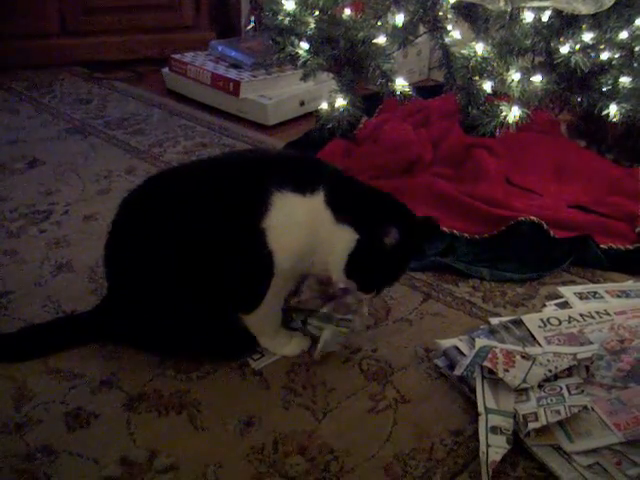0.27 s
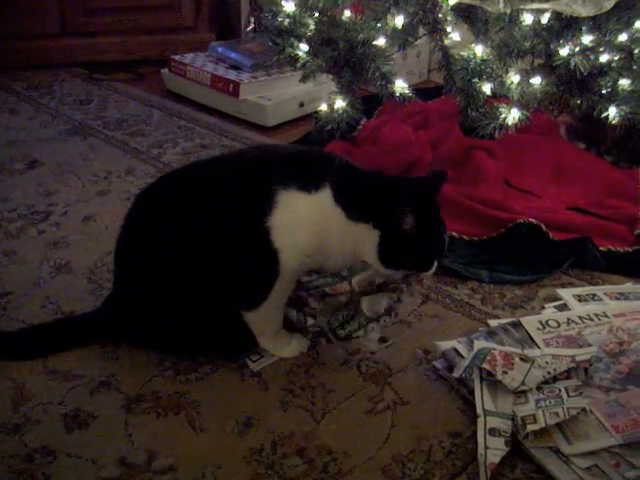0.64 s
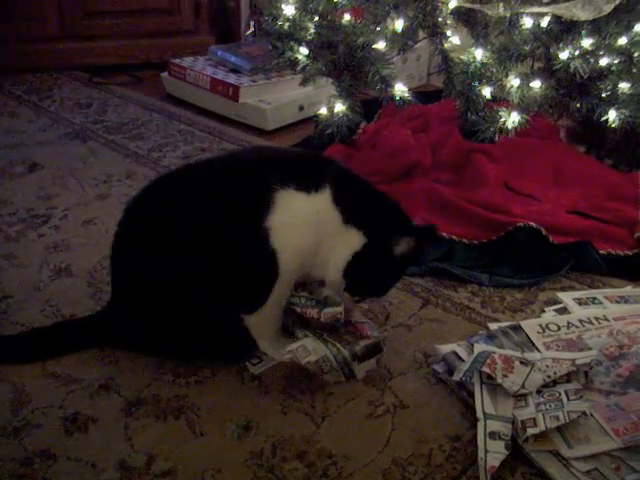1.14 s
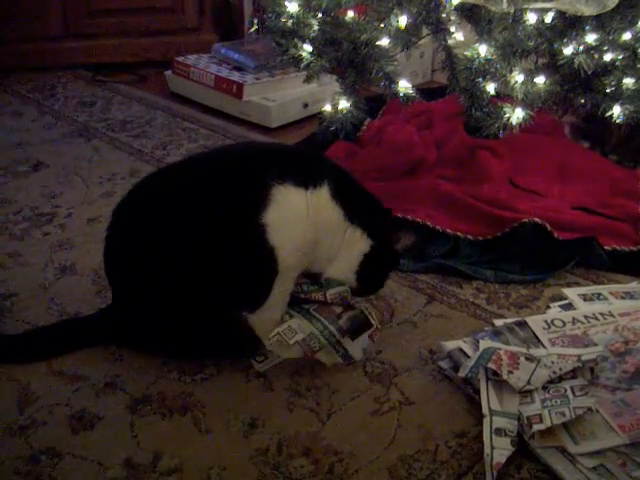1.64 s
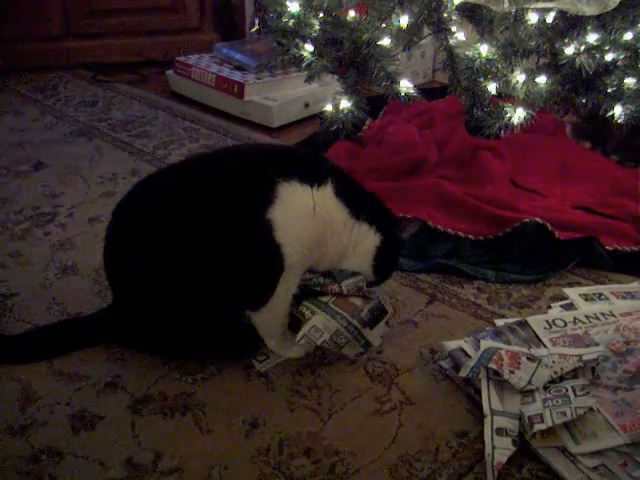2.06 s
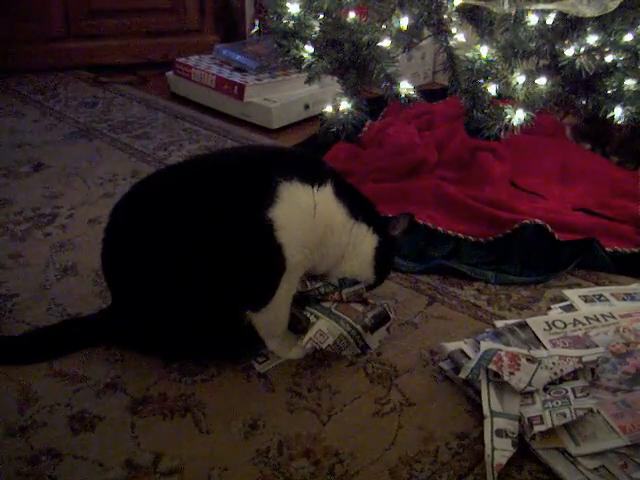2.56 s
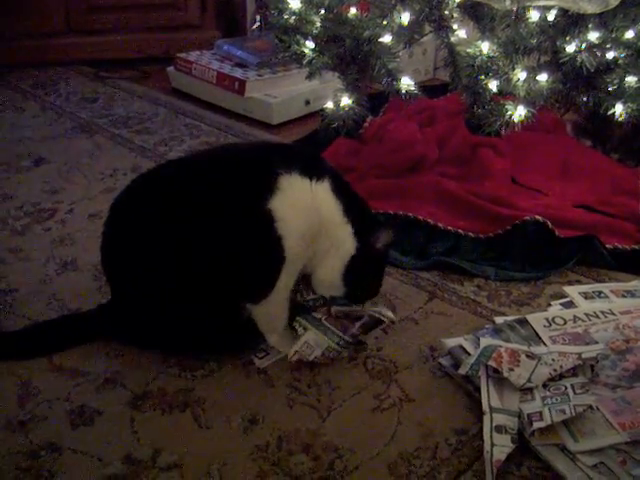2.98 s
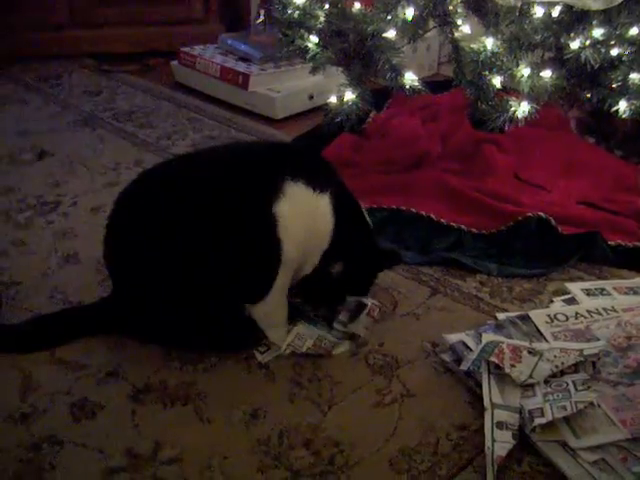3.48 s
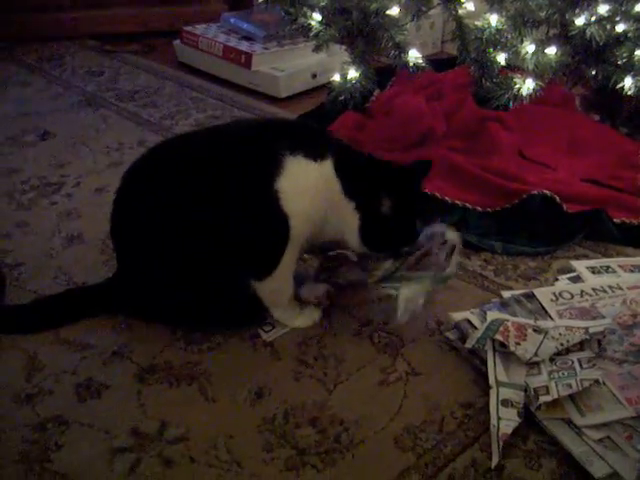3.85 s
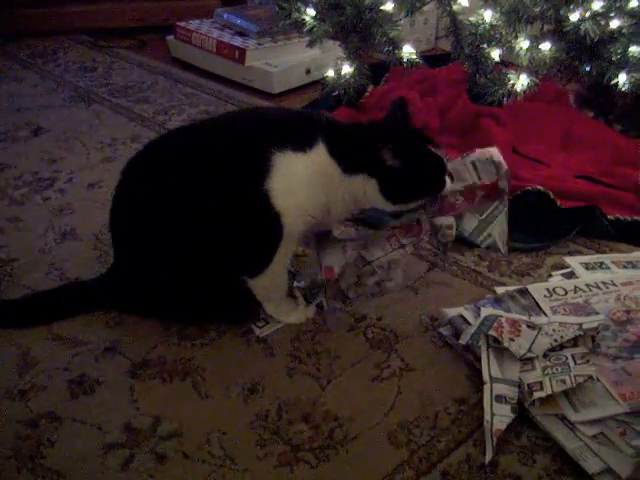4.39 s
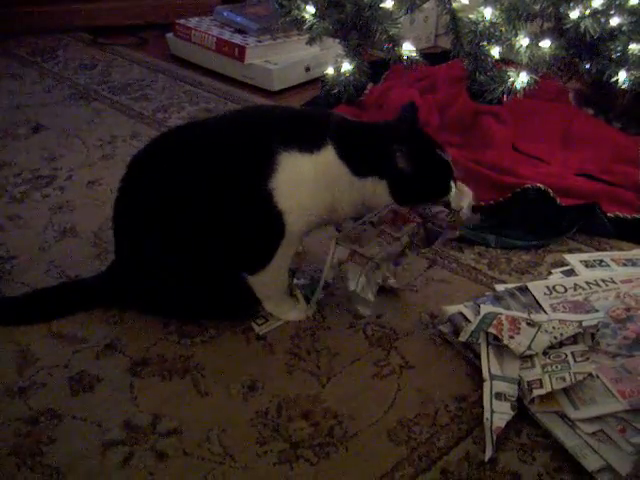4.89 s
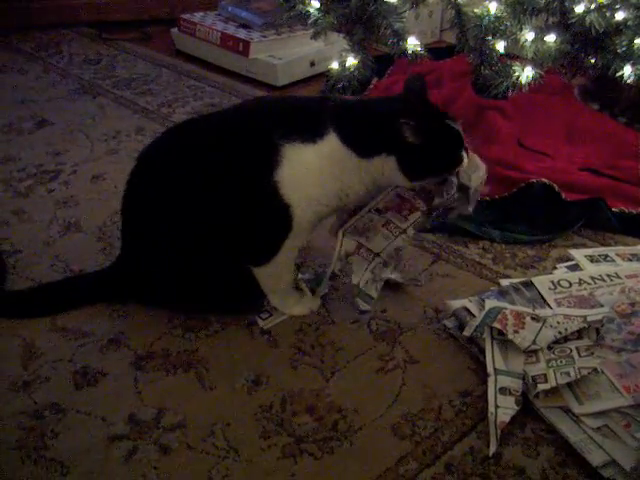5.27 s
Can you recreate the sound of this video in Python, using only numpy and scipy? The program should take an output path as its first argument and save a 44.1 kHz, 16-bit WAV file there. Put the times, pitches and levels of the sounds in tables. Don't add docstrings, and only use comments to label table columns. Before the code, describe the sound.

Newspaper tears sharply, falls nearly quiet with small crackles and thumps, then rips again in jerky pulls, close by in a hissy room.

```python
import sys
import numpy as np
from scipy import signal
from scipy.fft import rfft, irfft, next_fast_len
from scipy.io import wavfile
from scipy.ndimage import uniform_filter1d, map_coordinates

SR = 44100
rng = np.random.default_rng(int(sys.argv[2]) if len(sys.argv) > 2 else 0)


def generate_wav(signal):
    frames = np.transpose(np.atleast_2d(signal))
    scaled = np.clip(frames, -1, 1) * 32767
    pcm = np.round(scaled).astype(np.int16)
    wavfile.write(sys.argv[1], SR, pcm)


def invert_db(level):
    return 10 ** (np.asarray(level, dtype=float) / 20)


N = 243917

# f/Hz, density/dB per Hz
HISS_SPECTRUM = [(12, -5), (25, 3), (60, -2.5), (150, -8), (500, -15), (1200, -18.5), (2000, -19.5),
                 (3500, -21.5), (6000, -19.5), (9000, -19), (10400, -17), (11300, -44.5)]
# f/Hz, rms level/dB
WHINES = [(7299, -69.5), (8078, -64.5)]
# rate/(1/s), t of one pause/s, pause length/s
SENSOR_PAUSE = (24, 1.237, .008)
# t peak/s, tearing level/dB, length/s, flapping rel/dB, crispness rel/dB
RIPS = [(0.036, -52, 0.38, 2.5, -3.5), (0.209, -46.5, .09, 6, 14.5), (0.334, -41.5, 0.11, -9.5, -12),
        (.475, -38, 0.14, -1, -6), (0.583, -31, 0.12, -8, -3.5), (2.036, -60, 0.057, 8.5, -14),
        (2.564, -66.5, 0.24, 6.5, -10), (2.82, -59.5, 0.19, 1, -6), (2.983, -57.5, 0.08, 11.5, -8),
        (3.512, -61.5, 0.29, 10, 3), (3.731, -53, .2, 8.5, -7), (3.865, -43.5, 0.052, 3.5, -0.5),
        (3.931, -32, 0.13, -3, -4), (4.087, -53.5, 0.12, -3, -6), (4.29, -41.5, 0.2, -3, -8.5),
        (4.652, -56.5, 0.19, -4, -4), (4.754, -52.5, 0.27, 0.5, -7), (4.806, -44.5, 0.17, -2, -9),
        (4.945, -53, .06, 3.5, -1), (5.116, -36.5, 0.13, -5, -5.5), (5.214, -52.5, 0.22, 3.5, -4),
        (5.347, -55.5, .3, -0.5, -2), (5.454, -39, .11, -5.5, -5), (5.535, -38, 0.058, -3, -0.5)]
# t/s, tearing level/dB, fade/s, flapping rel/dB, crispness rel/dB
TUGS = [(0.179, -44, 0.47, 4.5, -4), (0.252, -48.5, 0.12, 11, 8.5), (.5, -53.5, .15, 7, 7),
        (.62, -50, 0.085, -1, -3), (.69, -61, 0.55, 6, -4), (.92, -71, 0.039, 0, 7),
        (1.14, -59, 0.088, 7, -12), (1.604, -56.5, 0.084, 6.5, -4), (1.748, -56, 0.054, -1, -17),
        (1.8, -63, .2, 5.5, -5), (2.404, -57, 0.056, -2, -10), (2.716, -64, .06, 7, -9),
        (2.901, -52, .05, 7, -2), (3.266, -63, .3, 8, -6), (3.381, -53, 0.042, 7, -3),
        (3.586, -53.5, 0.68, -5, -9), (3.784, -48.5, 0.039, -20, -4), (3.99, -61, 0.19, 6, -4),
        (4.167, -48, 0.025, -2, -16), (4.188, -42.5, 0.19, -2, -8), (4.564, -52, 0.26, 2.5, -12),
        (4.884, -47, 0.074, 1, -19), (4.964, -46.5, 0.16, -1.5, -6), (5.304, -47, .03, 0, -11)]
# tearing level/dB, flapping rel/dB, crispness rel/dB
CREEP = (-74, 9.5, -9)
# t/s, length/s, level/dB, change to the end/dB
HAUL = (3.575, .14, -44.5, -2.5)
# f/Hz, density/dB per Hz
TEAR_SPECTRUM = [(1200, -33), (2000, -1), (3000, -1.5), (4500, -2.5), (6500, -2.5), (8000, 1), (10500, -20),
                 (11500, -62.5)]
# f/Hz, density/dB per Hz
CRISP_SPECTRUM = [(6000, -15), (7800, -15.5), (9000, 10), (10400, -1), (11500, -26.5)]
# f/Hz, density/dB per Hz
FLAP_SPECTRUM = [(60, -13.5), (150, -0.5), (300, 0), (600, -3), (1100, -5.5), (1600, -16), (2500, -46)]
# f/Hz, density/dB per Hz
SCRAPE_SPECTRUM = [(700, -13), (1200, 0.5), (1700, -1.5), (2600, -6.5), (3500, -38)]
# t/s, peak level/dB, f/Hz, after-ring rel/dB
KNOCKS = [(0.021, -34, 804, -10.5), (0.054, -35.5, 540, -22), (0.101, -30, 380, -23),
          (0.171, -31, 460, -8.5), (0.217, -29.5, 540, -14), (0.246, -33, 570, -17),
          (0.274, -45, 1320, 7.5), (0.363, -36, 530, -15), (0.561, -32.5, 730, -8), (0.723, -37, 386, -9.5),
          (1.602, -45, 1220, -12), (1.744, -43, 697, -14), (2.03, -34.5, 238, -8), (2.403, -36, 238, -15),
          (2.715, -41, 686, -20), (2.751, -39, 364, -17), (2.81, -29.5, 322, -23), (2.891, -24, 526, -48),
          (2.969, -40.5, 766, -13), (2.986, -43, 220, -3.5), (3.265, -40.5, 1100, -10.5),
          (3.354, -43, 373, -16), (3.467, -42, 880, -7.5), (3.503, -40, 530, -13),
          (3.575, -30.5, 1160, -17), (4.722, -41.5, 630, -12), (3.849, -39, 644, -26),
          (4.24, -37.5, 200, -4.5), (4.279, -38.5, 161, -4.5), (5.328, -40, 510, -10)]
# t/s, peak level/dB, brightness/dB, f/Hz
SNAPS = [(0.1731, -20, -11.5, 3110), (0.2122, -30, -4, 3200), (0.2498, -25, -3, 3200),
         (0.3202, -29, -10, 3360), (0.3597, -32.5, -13, 3100), (0.3776, -28, -14, 3280),
         (0.4257, -38, -16, 3060), (0.4674, -25, -7, 3200), (0.5637, -24.5, -2, 2380),
         (0.572, -23.5, -4, 2660), (0.5897, -23.5, -11, 3230), (0.598, -21, -4, 2670),
         (3.725, -33.5, -25, 2880), (3.7768, -29, -6.5, 3070), (3.8508, -39, -2, 2550),
         (3.8796, -36, -11, 3140), (3.908, -22, -20, 2730), (4.1606, -33, -6.5, 2570),
         (4.179, -33, -9, 2370), (4.281, -30.5, -13, 3010), (4.3159, -28.5, -20, 2180),
         (4.7168, -41, -9, 3110), (4.794, -35.5, 3.5, 2270), (4.8818, -37, -0.5, 3170),
         (4.9613, -31.5, 0.5, 1960), (5.088, -36, -4, 3000), (5.221, -33.5, -8, 2040),
         (5.2918, -33.5, -6, 2110), (5.4148, -46.5, 7, 3070), (5.439, -31.5, -4, 3020),
         (0.7893, -44.5, -12, 2500), (0.915, -48, 2.5, 3250), (1.092, -44.5, -21, 1600),
         (1.136, -47, -4, 2520), (1.2211, -41.5, -16, 2270), (1.6032, -36.5, -14, 3240),
         (1.6279, -40, -13, 2180), (1.7479, -43, -21, 2300), (2.4041, -39.5, -13, 2230),
         (2.6178, -45.5, -11, 3130), (2.7179, -46, -12, 3270), (2.814, -42, -18, 2290),
         (2.8944, -33, -10, 3260), (2.9722, -43, -15, 2120), (3.2686, -46, -15, 2310),
         (3.3562, -48, -10, 2690), (3.38, -37.5, -9, 2640), (3.5777, -47, -27, 1820),
         (4.054, -48, -4, 3150), (4.065, -42, -20, 2560), (4.0837, -43, -9, 3320), (4.5624, -49, -8, 3100),
         (4.5905, -39, -9, 3120), (4.618, -43, 1, 2400), (4.6603, -45, -14, 2900), (4.7245, -41, -6, 3020),
         (4.7707, -40, -15, 2530), (5.0328, -42.5, 1, 2160), (5.3894, -43, -7, 2830)]
# f/Hz, density/dB per Hz
SNAP_UPPER_SPECTRUM = [(2500, -15), (4000, 1), (5000, 5), (7000, 2.5), (8000, 5.5), (9500, -51)]
# t/s, level/dB, relaxation/s
TAUT_POP = (5.3004, -18, 0.0066)
# f/Hz, t60/s
ROOM_DECAY = [(200, 0.34), (1500, 0.056), (5000, 0.087), (11000, 0.017)]
# delay/s, share/1
HOUSING_ECHO = (.00052, .46)
# t/s, length/s, kept share/1
TREBLE_DIPS = [
    (.16, .012, .03),
    (2.877, .014, .5),
    (3.765, .011, .35),
    (4.942, .01, .45),
    (5.281, .008, .4),
]


def unit(x):
    return x / np.sqrt(np.mean(x ** 2) + 1e-20)


def along(points, hz):
    f, v = np.transpose(points)
    return np.interp(np.log(hz + 1), np.log(f + 1), v)


def wobble(knots_per_s):
    knots = rng.standard_normal(int(N * knots_per_s / SR) + 4)
    return map_coordinates(knots, [np.arange(N) * knots_per_s / SR])


def coloured(x, spectrum):
    size = 8192
    ceps = irfft(np.log(invert_db(along(spectrum, np.fft.rfftfreq(size, 1 / SR)))))
    ceps[1:size // 2] *= 2
    ceps[size // 2 + 1:] = 0
    kernel = irfft(np.exp(rfft(ceps)))
    return signal.fftconvolve(x, kernel / np.linalg.norm(kernel))[:N]


def camera():
    t = np.arange(N) / SR
    level_db = -60 + 1.02 + 1.66 * wobble(2.61)
    hiss = invert_db(level_db) * coloured(rng.standard_normal(N), HISS_SPECTRUM)
    tones = []
    for hz, db in WHINES:
        gain = invert_db(db + 4 + 0.5 * wobble(20))
        tones.append(gain * np.sin(2 * np.pi * hz * t + 0.65 * wobble(25)))
    rate_hz, pause_s, length_s = SENSOR_PAUSE
    from_pause = np.abs(((t - pause_s) * rate_hz + .5) % 1 - .5)
    reading = from_pause > length_s * rate_hz / 2
    return hiss + uniform_filter1d(1. * reading, size=60) * tones[0] + sum(tones[1:])


def strain():
    rise_share, rounding, attack_s = 0.55, 1.445, 0.014
    scrape_db, scrape_follows_flap = -9.5, 0.56
    t = np.arange(0, N + 44, 44) / SR
    pulls = [(s, db, rise_share * length, (1 - rise_share) * length, rounding, *mix)
             for s, db, length, *mix in RIPS]
    pulls += [(s, db, attack_s, fade, 1, *mix) for s, db, fade, *mix in TUGS]
    pulls += [(0, CREEP[0], 1, np.inf, 1, *CREEP[1:])]
    s, db, rise, fall, bend, flap_db, crisp_db = np.transpose(pulls)[..., None]
    level = db - 20 * np.abs(np.where(t < s, (s - t) / rise, (t - s) / fall)) ** bend
    scraping = level + scrape_db + scrape_follows_flap * flap_db
    layers = [level, level + flap_db, level + crisp_db, scraping]
    power = np.array([np.sum(invert_db(2 * layer), axis=0) for layer in layers])

    start, length, haul_db, change_db = HAUL
    u = (t - start) / length
    envelope = np.clip(np.minimum(u / 0.034, (1.2 - u) / 0.42), 0, 1)
    power[-1] += invert_db(2 * (haul_db + change_db * u)) * envelope ** 2
    return [np.interp(np.arange(N) / SR, t, np.sqrt(p)) for p in power]


def grains(per_s, centre_hz, octaves, cycles, spread_db):
    draw = rng.random((int(per_s * N / SR), 4))
    hz = centre_hz * 2 ** (octaves * (2 * draw[:, 1:2] - 1))
    t = np.arange(96) / SR
    size = invert_db(-spread_db * np.log(draw[:, 2:3] + 3e-3)) * np.sign(draw[:, 3:] - .5)
    shape = size * np.sin(2 * np.pi * hz * t) * np.exp(-t * hz / cycles)
    at = (draw[:, :1] * N).astype(int) + np.arange(len(t))
    return unit(np.bincount(at.ravel(), shape.ravel())[:N])


def cracks(per_s, spread_db, clump, bed):
    draw = rng.random((2, N))
    size = invert_db(-spread_db * np.log(draw[1] + 0.0026))
    breaks = (draw[0] < per_s / SR) * size * rng.standard_normal(N)
    return unit(clump * (unit(breaks) + bed * rng.standard_normal(N)))


def paper():
    tearing, flapping, crackling, scraping = strain()
    jerk = invert_db(1.2 * wobble(50) + 2.2 * wobble(260))
    buckling = grains(per_s=1700, centre_hz=4000, octaves=1.1, cycles=3, spread_db=2.6)
    fibres = cracks(per_s=2500, spread_db=1.6, clump=jerk, bed=.6)
    tear = unit(coloured(jerk * buckling + .65 * fibres, TEAR_SPECTRUM))
    crisp_clump = jerk * invert_db(2.5 * wobble(120))
    crisp = coloured(cracks(per_s=3500, spread_db=1.7, clump=crisp_clump, bed=.5), CRISP_SPECTRUM)
    flap_clump = jerk * invert_db(1.2 * wobble(40))
    flap = coloured(cracks(per_s=700, spread_db=1.7, clump=flap_clump, bed=.55), FLAP_SPECTRUM)
    scrape = coloured(cracks(per_s=1500, spread_db=1.5, clump=jerk ** .6, bed=.6), SCRAPE_SPECTRUM)

    crisp_db = 20 * np.log10(crackling / tearing)
    low = signal.sosfiltfilt(signal.butter(4, 3800, fs=SR, output="sos"), tear)
    tear = low + invert_db(0.22 * np.clip(crisp_db + 8, -10, 10)) * (tear - low)
    sheet = invert_db(-2.5) * tearing * tear + invert_db(-6.5) * crackling * crisp + invert_db(-5.0) * flapping * flap
    return sheet, invert_db(1.5) * scraping * scrape


def knocks():
    out, t = np.zeros(N + SR), np.arange(SR // 10) / SR
    for s, db, hz, ring_db in KNOCKS:
        push = np.sin(2 * np.pi * 600 * t) * np.exp(-t / .00095)
        ring = np.sin(2 * np.pi * hz * t) * invert_db(ring_db + 8 - 60 * t * hz / 13)
        puff = uniform_filter1d(rng.standard_normal(len(t)), size=14) * invert_db(-60 * t / 0.046)
        out[round((s + .004) * SR):][:len(t)] -= invert_db(db - .5) * (push + ring + .25 * puff)
    return out[:N]


def snaps():
    crisp_under_db, crisp_grows = -8.5, 0.67
    body, upper, crisp = np.zeros((3, N + SR))
    t = np.arange(SR // 10) / SR
    fizz = 0.61 * invert_db(-60 * t / 0.0028) + 0.21 * invert_db(-60 * t / 0.049)
    for s, db, upper_db, hz in SNAPS:
        burst = rng.standard_normal((2, len(t))) * fizz
        burst[:, 0] = -1
        start = round((s + .0013) * SR)
        at = slice(start, start + len(t))
        ring = np.sin(2 * np.pi * hz * t) * invert_db(-60 * t / .006)
        body[at] -= invert_db(db - .3) * (ring + .7 * np.exp(-t / .00012))
        upper[at] += invert_db(db + upper_db + 2.0) * burst[0]
        crisp[at] += invert_db(db + crisp_under_db + crisp_grows * upper_db) * burst[1]
    return body[:N] + coloured(upper, SNAP_UPPER_SPECTRUM) + coloured(crisp, CRISP_SPECTRUM)


def pop():
    start_s, db, relax_s = TAUT_POP
    t = np.arange(N) / SR - start_s

    def step(u):
        return np.clip(u / .0001, 0, 1) * np.exp(-np.abs(u) / relax_s)

    return invert_db(db) * (step(t) - step(t - HOUSING_ECHO[0]))


def room(x):
    hz, t, z = signal.stft(rng.standard_normal(SR // 3), SR, nperseg=256)
    decay = invert_db(-60 * t / along(ROOM_DECAY, hz)[:, None])
    tail = signal.istft(z * decay, SR, nperseg=256)[1]
    return signal.fftconvolve(np.pad(x, (300, 0)), tail / np.linalg.norm(tail))[:N]


def housing(x):
    delay_s, share = HOUSING_ECHO
    m = next_fast_len(N + SR // 10)
    hz = np.fft.rfftfreq(m, 1 / SR)
    return irfft(rfft(x, m) * (1 - share * np.exp(-2j * np.pi * hz * delay_s)), m)[:N]


def scene():
    sheet, scrape = paper()
    hits = knocks() + snaps()
    echoes = invert_db(-13) * room(hits) + invert_db(-10.5) * room(sheet)
    mono = housing(sheet + hits + echoes) + scrape + pop() + camera()
    return np.array([mono, mono])


def low_pass(x):
    return signal.sosfilt(signal.butter(12, 11480, fs=SR, output="sos"), x)


def record(dry):
    t = np.arange(N) / SR
    lost = sum((1 - kept) * ((t > s) & (t < s + length)) for s, length, kept in TREBLE_DIPS)
    bass = signal.sosfiltfilt(signal.butter(6, 3100, fs=SR, output="sos"), dry)
    starved = dry - uniform_filter1d(lost, size=90) * (dry - bass)
    rounded = .16 * np.tanh(starved / .16)
    limit = signal.ellip(10, .5, 60, 11100, fs=SR, output="sos")
    return low_pass(signal.sosfilt(limit, rounded))


dry = scene()
out = record(dry)
generate_wav(out)
```